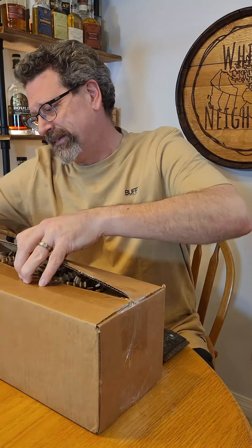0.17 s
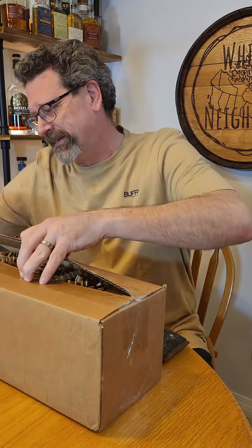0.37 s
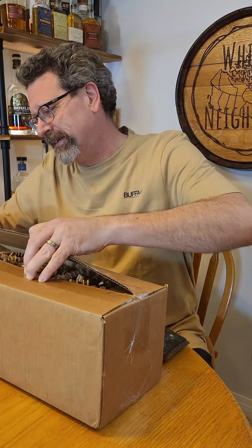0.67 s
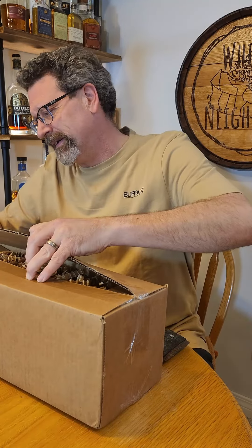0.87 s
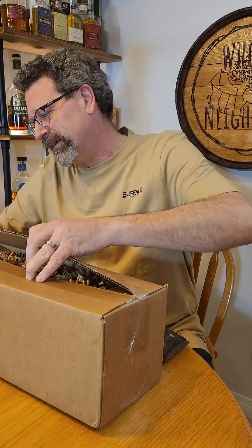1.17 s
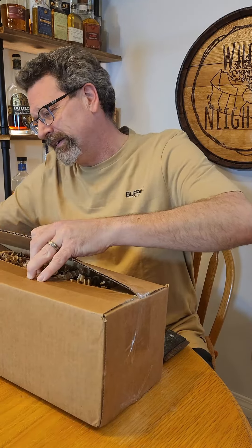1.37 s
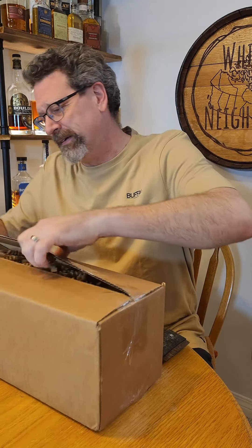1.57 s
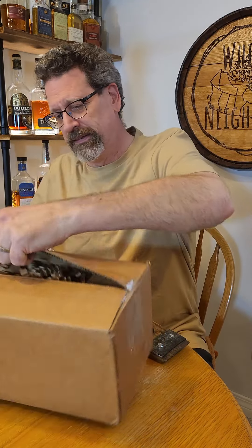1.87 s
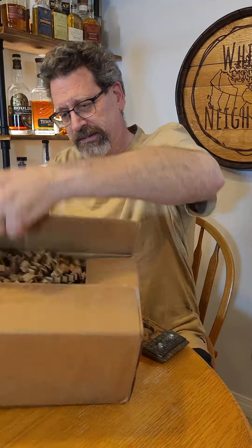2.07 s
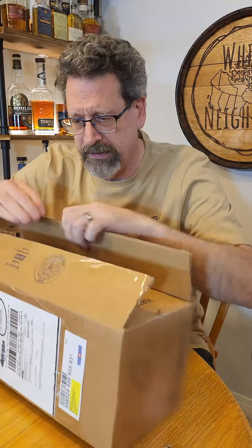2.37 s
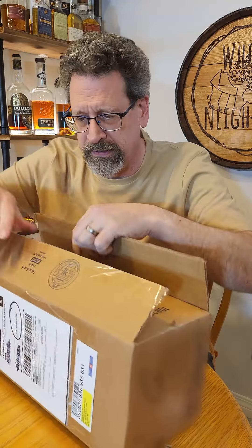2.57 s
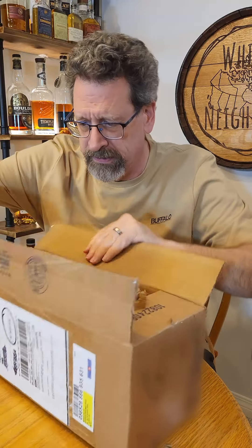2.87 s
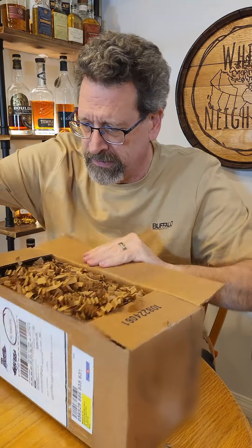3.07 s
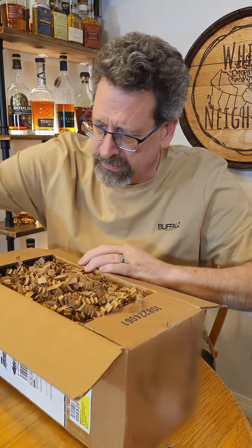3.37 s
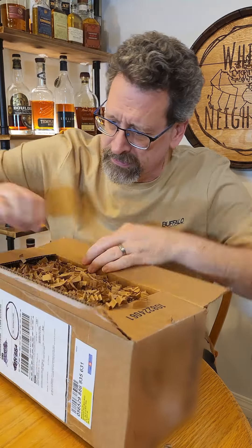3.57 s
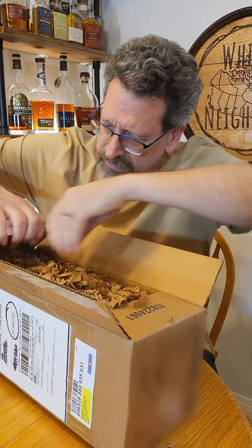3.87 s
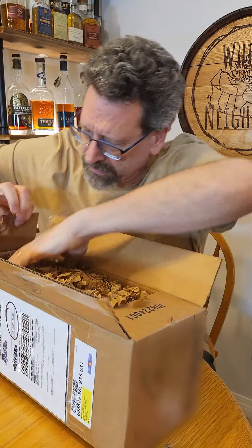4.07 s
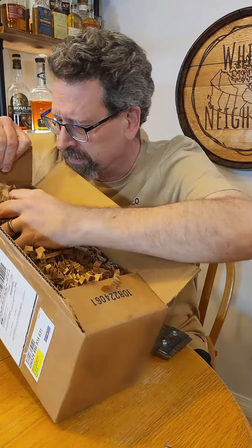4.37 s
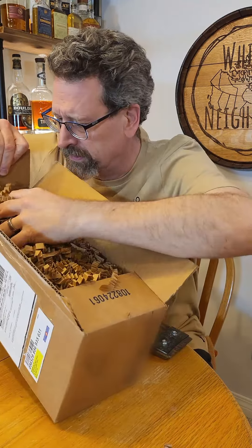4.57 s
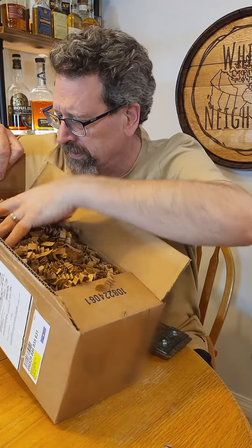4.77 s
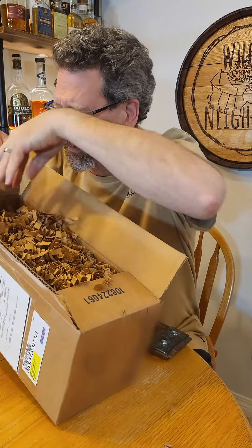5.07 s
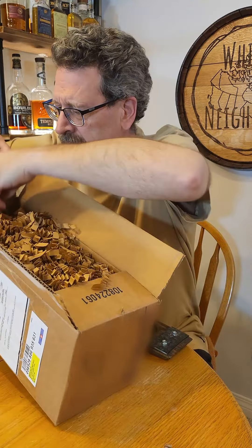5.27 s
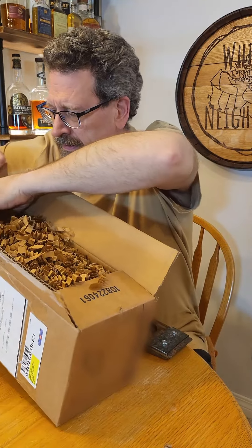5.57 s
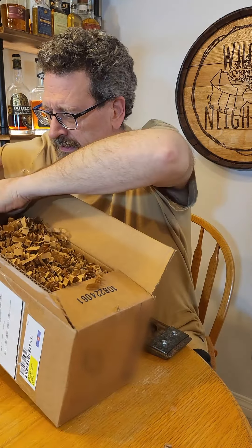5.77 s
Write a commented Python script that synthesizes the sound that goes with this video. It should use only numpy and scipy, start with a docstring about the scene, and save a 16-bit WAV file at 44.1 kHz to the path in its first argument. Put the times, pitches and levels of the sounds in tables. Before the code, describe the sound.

Hands open a cardboard box and dig through crinkly paper filler, with rustling, scraping flaps and hollow knocks on a table.

```python
"""Digging through a cardboard box

A small room, one small microphone close to a wooden table. Hands open a box and dig through crinkled
paper strips, which rustle and snap as their creases buckle. The flaps slip, scraping and creaking;
the box rocks on the table with a rumble, and knocks ring its walls and the air inside."""
import sys
import numpy as np
from scipy import signal
from scipy.fft import rfft, irfft
from scipy.io import wavfile
from scipy.ndimage import uniform_filter1d

SR = 44100
rng = np.random.default_rng(int(sys.argv[2]) if len(sys.argv) > 2 else 0)


def master_out(mix):
    """Clip the mix to full scale and print it as 16-bit PCM to the path in sys.argv[1]."""
    frames = np.transpose(np.atleast_2d(mix))
    ceiling = np.clip(frames, -1, 1)
    pcm = np.round(ceiling * 32767).astype(np.int16)
    wavfile.write(sys.argv[1], SR, pcm)


N = 261188


def gain_of(db):
    """Decibels to amplitude."""
    return 10 ** (np.asarray(db) / 20)


def unit_rms(x):
    """Scales to rms 1."""
    return x / np.sqrt(np.mean(x ** 2) + 1e-20)


def unit_peak(x):
    """Scales to peak 1."""
    return x / abs(x).max()


def steadied(x, window_s):
    """Evens out the chance swells of a noise."""
    power = uniform_filter1d(x ** 2, int(window_s * SR))
    return x / np.sqrt(abs(power) + 1e-20)


def curve_at(points, hz):
    """Reads (freq_hz, value) points on a log frequency axis."""
    freq_hz, value = np.transpose(points)
    return np.interp(np.log(hz + 1), np.log(freq_hz + 1), value)


def add(mix, start_s, sound):
    """Mixes a sound in at start_s."""
    part = mix[round(start_s * SR):][:len(sound)]
    part += sound[:len(part)]


def colour(x, spectrum):
    """Minimum-phase filter through (freq_hz, level_db) points."""
    hz = abs(np.fft.fftfreq(8192, 1 / SR))
    log_gain = np.log(gain_of(curve_at(spectrum, hz)))
    phase = -signal.hilbert(log_gain).imag
    taps = np.fft.ifft(np.exp(log_gain + 1j * phase)).real[:4096]
    return signal.oaconvolve(x, taps)[:len(x)]


def resonance(x, hz, width_hz):
    """Two-pole resonance of gain 1."""
    return signal.lfilter(*signal.iirpeak(hz, hz / width_hz, SR), x)


def clumps(per_s, depth_db):
    """Random swell that bunches the grains."""
    drift = uniform_filter1d(rng.standard_normal(N), int(SR / per_s))
    return gain_of(depth_db * unit_rms(drift))


def clicks(per_s, spread_db):
    """Sparse impulses of random sign, a few of them large."""
    fires = rng.random(N) < per_s / SR
    sign = np.sign(rng.standard_normal(N))
    size = np.minimum(rng.exponential(1, N), 4)
    return fires * sign * gain_of(spread_db * size)


def gesture_powers(gestures, db):
    """Power of each hand gesture, every millisecond: up 20 dB over its rise, down 20 dB over its fall."""
    peak_s, rise_ms, fall_ms = np.array(gestures).T[:3, :, None]
    late_ms = np.arange(N * 1000 // SR + 2) - 1000 * peak_s
    drop_db = 20 * np.maximum(-late_ms / rise_ms, late_ms / fall_ms)
    return gain_of(db[:, None] - drop_db) ** 2


def ms_to_samples(curve):
    """Stretches one value a millisecond to one a sample."""
    return np.interp(np.arange(N) / SR * 1000, np.arange(len(curve)), curve)


def gesture_gain(gestures, db, lag_ms=0.1):
    """Gain of all gestures together, following them with a lag."""
    pole = np.exp(-1 / lag_ms)
    power = signal.lfilter([1 - pole], [1, -pole], gesture_powers(gestures, db).sum(0))
    return ms_to_samples(np.sqrt(power))


def gesture_pitch(gestures, db, hz):
    """The loudest gestures of the moment set the favoured pitch."""
    power = gesture_powers(gestures, db) + 1e-30
    return ms_to_samples(np.exp(np.log(hz) @ power / power.sum(0)))


# Tone colour of the paper through the close microphone, with the microphone's resonance near 6 kHz:
# freq_hz, relative_db
PAPER_AT_MIC = [(350, -27), (600, -6.5), (1100, -3.5), (2200, -0.5), (3100, -3.5), (3900, -6.5), (5000, -5),
                (5900, -3), (6600, -6.5), (7400, -10), (8200, -6.5), (9200, -9), (10700, -7.5),
                (14900, -16), (16000, -21)]
# Hands stirring the paper in the box: peak_s, rise_ms, fall_ms, strips_db, sheets_offset_db
PAPER_STIRS = [(0, 722.0, 150, -46.5, 0.5), (0.091, 140, 170, -42.5, 3.5), (0.173, 10, 97, -36.5, -0.5),
               (0.493, 243.0, 70.0, -62.5, 1), (0.566, 39, 95, -58.5, 5), (0.673, 80.0, 24.0, -60, 2.5),
               (0.71, 9.4, 70, -48.5, 0), (0.855, 223.0, 114, -62, 3), (1.148, 7.1, 37, -60, 4),
               (1.245, 55.0, 63.0, -67, 7), (1.311, 20, 67, -42.5, 2), (1.337, 9.2, 51, -28, 0),
               (1.363, 16.0, 110, -41.5, 4.0), (1.478, 350.0, 234.0, -56, -0.5), (1.534, 76, 150, -47.5, 1),
               (1.66, 30, 89, -47.5, 6.5), (1.77, 120, 210, -55.5, 2), (1.85, 130, 230, -58, 0.5),
               (1.97, 11, 104, -30.5, 1.0), (2.038, 9.5, 200, -40.5, 1), (2.194, 45, 110, -33.5, 1.0),
               (2.306, 23.0, 147.0, -47.0, 0.0), (2.411, 12, 62, -38.5, -0.5),
               (2.479, 42, 180.0, -41.0, -1.0), (2.64, 80, 91, -52, 2), (2.735, 86, 81, -43.0, -1.5),
               (2.88, 180, 310, -44, -1.5), (3.062, 57, 116, -51.5, -0.0), (3.259, 330, 260, -49, 1),
               (3.38, 26, 39.0, -49, 1.5), (3.463, 37, 36, -40.5, -1.5), (3.537, 58.0, 62, -52.0, 3),
               (3.58, 8.3, 270, -57.5, -1.5), (3.747, 49.0, 250, -43, -4), (3.924, 8.1, 31, -48, -1.0),
               (4.038, 5.8, 40, -45, 3.0), (4.093, 44, 71, -40.0, -0.5), (4.156, 120, 220, -37.0, -4.5),
               (4.215, 126.0, 99, -42.5, -1), (4.363, 91, 143, -40, 0), (4.535, 230, 290, -48, -2.5),
               (4.69, 102, 410, -47.5, -4), (4.894, 170, 115, -41.0, -0.5), (5.112, 66, 135, -53, -1.5),
               (5.178, 51.0, 116, -58.5, 1.0), (5.433, 78, 220, -48, -1.0), (5.577, 30, 88.0, -42, -4.5),
               (5.66, 21, 97, -42.0, -4.0), (5.744, 180, 170, -44.5, -2.5), (5.8, 30, 53, -49, -5),
               (5.897, 77, 300, -46, 0.5)]


def paper_rustle():
    """Creases buckle: each click rings a patch of strip for a few cycles, over a hiss of sliding strips."""
    buckles = clicks(per_s=6000, spread_db=4.5)
    patch = rng.integers(0, 24, N)
    bunches = [clumps(per_s=54, depth_db=3) for _ in range(6)]  # strips of like size crackle together
    crackle, t = np.zeros(N), np.arange(200) / SR
    for k, hz in enumerate(np.geomspace(700, 15000, num=24)):
        grain = np.exp(-t * hz / 2.75) * np.sin(2 * np.pi * hz * t)
        grain *= np.sqrt(hz) / np.linalg.norm(grain)
        crackle += signal.oaconvolve(buckles * (patch == k) * bunches[k // 4], grain)[:N]
    rustle = unit_rms(crackle) + 1.28 * rng.standard_normal(N)
    rustle = colour(rustle * clumps(per_s=68, depth_db=1.5), PAPER_AT_MIC)
    spectrum = rfft(steadied(rustle, window_s=0.042))
    hz = np.fft.rfftfreq(N, 1 / SR)
    low = 1 / (1 + (hz / 4000) ** 8)  # broad sheets
    high = 1 - 1 / (1 + (hz / 7500) ** 8)  # thin edges
    sheets, strips, edges = (unit_rms(irfft(spectrum * band, N)) for band in (low, 1 - low - high, high))
    strips_db, sheets_offset_db = np.transpose(PAPER_STIRS)[3:]
    strips_gain = gesture_gain(PAPER_STIRS, strips_db)
    sheets_gain = gesture_gain(PAPER_STIRS, strips_db + sheets_offset_db + 0.5)
    return strips_gain * (strips + gain_of(-6.5) * edges) + sheets_gain * sheets


# Modes of the table, the box walls and the air inside: pitch_hz, width_hz, relative_db
BOX_MODES = [(49.4, 34, -9), (68.8, 30, 3.5), (88, 31, 2.5), (108, 45, 1), (140, 31.4, 2), (204, 30, -0.5),
             (239, 30, 4.5), (330, 77, 5.5), (415, 54, 6.5), (540, 67, 8.5), (690, 143, 4.5), (748, 62, 8),
             (876, 140, -1), (1100, 210, 1), (1270, 197, 4), (1430, 175, 5), (1594, 216, 1),
             (1930, 330, -6.5), (2430, 89, -12)]


def box_ring(drive, centre_hz, octaves, blow=False):
    """The box rings in the modes near the pitch a touch favours; a blow starts them all one way."""
    out = np.zeros(len(drive))
    for k, (hz, width_hz, db) in enumerate(BOX_MODES):
        sign = 1 if blow else (-1) ** k
        nearness = np.exp(-0.5 * (np.log2(hz / centre_hz) / octaves) ** 2)
        out += sign * gain_of(db) * nearness * resonance(drive, hz, width_hz)
    return out


# Hands moving the box on the table, levels relative:
# peak_s, rise_ms, fall_ms, scrape_db, scrape_hz, rock_db, rock_hz, sway_db
BOX_SHOVES = [(0.022, 582.0, 342.0, -34.5, 765, -36.5, 156.0, -49),
              (0.098, 130, 43, -28, 900, -44.0, 171.0, -51),
              (0.171, 2.9, 90, -18.5, 740, -15.5, 179, -30.0),
              (0.279, 7.0, 88, -46, 650.0, -41.5, 188.4, -41),
              (0.412, 4.0, 49, -45.5, 770.0, -40, 166, -53), (0.485, 7.0, 27.0, -45, 755, -40, 191, -47.0),
              (0.569, 27, 49.0, -44.5, 650.0, -46, 186, -51.0),
              (0.654, 7.5, 18.0, -43, 720.0, -32.5, 167.0, -46),
              (0.71, 6.2, 39, -28.5, 784, -31.5, 150, -53),
              (0.773, 562.0, 11.0, -56, 800.0, -52.0, 166.0, -54),
              (0.865, 250, 99, -48, 600.0, -51.5, 161, -81),
              (1.146, 2.53, 66, -32.5, 870, -39.5, 134.0, -58),
              (1.265, 21, 55, -32.5, 606, -33, 142.0, -41), (1.319, 25, 156, -29, 925, -25.5, 150.0, -47),
              (1.363, 100, 73, -23.5, 850, -60.0, 182.0, -72.0),
              (1.52, 290, 29, -38, 960, -36.5, 158.0, -44),
              (1.541, 45.0, 175, -34.5, 885, -44, 172.0, -59.0),
              (1.668, 46.0, 48, -47, 760.0, -36.5, 142, -46), (1.755, 44, 337.0, -44, 960, -48, 162, -46.5),
              (1.964, 4.1, 110, -15.5, 610.0, -17.5, 172, -25),
              (2.045, 28.0, 82, -31, 880.0, -29, 150, -30), (2.117, 8.0, 130, -33, 865, -27.5, 140.0, -40),
              (2.182, 12, 110, -22.5, 780, -20.5, 151, -33),
              (2.294, 71, 44, -31.5, 584, -38.0, 156.0, -76.0),
              (2.4, 99, 200, -36.5, 830.0, -38.5, 146, -48.0), (2.482, 14, 70, -28.5, 760.0, -26, 116, -43),
              (2.607, 26, 230.0, -42, 754, -47, 143.0, -77),
              (2.697, 4.0, 38, -40, 830.0, -22.5, 123, -26.5),
              (2.74, 24, 60.0, -37.5, 890.0, -47, 152, -63.0),
              (2.829, 47, 880, -41.5, 730, -42.5, 128, -47),
              (2.902, 10.0, 52.0, -48.0, 860.0, -47, 108.0, -33),
              (3.055, 2.9, 21, -24.5, 614, -14.5, 126, -17),
              (3.186, 71.0, 290, -38, 650.0, -41.5, 138, -42.0),
              (3.379, 54.0, 71.0, -47, 980.0, -45.0, 141.0, -47),
              (3.429, 4.6, 150, -38.5, 850, -41.5, 142.0, -41.5),
              (3.455, 4.0, 370, -52, 1290, -67.0, 148, -63), (3.748, 53, 204, -39.5, 970, -46, 181, -49),
              (3.92, 6.5, 610, -54.5, 1010, -54.5, 148, -59), (4.035, 4.0, 55, -37, 680.0, -27, 167, -31.5),
              (4.152, 93, 170, -36, 980, -43.5, 155, -51),
              (4.251, 39, 160, -72.0, 970.0, -42.5, 141, -42.5),
              (4.357, 50.0, 120, -36.5, 920, -43.5, 131.0, -51),
              (4.415, 130, 44, -41, 1060.0, -78.0, 189.0, -81.0),
              (4.535, 76, 220, -42.5, 835, -50, 196, -53),
              (4.658, 17.0, 330, -52.0, 730.0, -63, 164.5, -68),
              (4.904, 160, 47, -34.5, 1070.0, -36.5, 111, -39.5),
              (5.028, 5.9, 17.3, -47, 1255, -62, 123, -92),
              (5.112, 92.0, 160, -66, 1200.0, -95.0, 128.0, -81.5),
              (5.492, 330, 160, -48.0, 730, -56, 174.0, -57.5),
              (5.57, 39.0, 180, -47.5, 680.0, -44.5, 169, -58),
              (5.741, 260, 85.0, -41.5, 860, -50, 168.0, -59),
              (5.9, 100, 142.0, -42.5, 760.0, -55, 149.0, -65.0)]


def flap_scrape():
    """Flaps slip unevenly against each other and drive the wall modes."""
    db, hz = np.transpose(BOX_SHOVES)[3:5]
    slips = unit_rms(clicks(per_s=1500, spread_db=4)) + 0.98 * rng.standard_normal(N)
    slips *= clumps(per_s=77, depth_db=6)
    walls = box_ring(slips, gesture_pitch(BOX_SHOVES, db, hz), octaves=0.9)
    return steadied(walls, window_s=0.019) * gesture_gain(BOX_SHOVES, db - 2.5)


def box_rumble():
    """The loaded box rocks on the table, and the table top sways, following the weight on it."""
    rock_db, rock_hz, sway_db = np.transpose(BOX_SHOVES)[5:]
    rock = box_ring(rng.standard_normal(N), gesture_pitch(BOX_SHOVES, rock_db, rock_hz), octaves=0.61)
    sway = box_ring(rng.standard_normal(N), centre_hz=55.2, octaves=0.47)
    rock = steadied(rock, window_s=0.05) * gesture_gain(BOX_SHOVES, rock_db - 2.5, lag_ms=4)
    sway = steadied(sway, window_s=0.081) * gesture_gain(BOX_SHOVES, sway_db + 0.5, lag_ms=11)
    return rock + sway


# Single snaps of paper and tape, near the microphone: start_s, peak_db, centre_hz
PAPER_SNAPS = [(.069, -31, 3010), (0.1693, -23, 2820), (0.279, -33, 3190), (0.485, -36, 2640),
               (.7071, -23.5, 2430), (.8634, -37, 3190), (1.1448, -35.5, 4330), (1.3234, -14.5, 4960),
               (1.336, -7, 5200), (1.4734, -23, 5340), (1.537, -28, 3550), (1.6223, -28.5, 2500),
               (1.6553, -28, 2650), (1.8366, -29, 5460), (1.9609, -14, 2950), (2.0436, -14.5, 4500),
               (2.1829, -33, 2660), (2.1979, -20, 6130), (2.308, -36, 5680), (2.407, -29, 5540),
               (2.4773, -34, 3110), (2.571, -33, 6370), (2.697, -27, 6060), (2.871, -34, 5700),
               (3.058, -41, 4480), (3.107, -27.5, 5650), (3.157, -33.5, 2490), (3.259, -28.5, 4070),
               (3.3773, -31.5, 3040), (3.4326, -32, 5340), (3.454, -28, 6350), (3.5362, -34, 4300),
               (3.584, -30, 5500), (3.7334, -34, 5950), (3.9245, -36, 3450), (4.0374, -26.5, 3100),
               (4.0811, -40, 4780), (4.1367, -22, 6200), (4.2901, -34, 6140), (4.3308, -20, 5760),
               (4.496, -27, 5990), (4.561, -29, 4650), (4.683, -36.5, 5980), (4.869, -24.5, 5760),
               (5.11, -28, 5300), (5.401, -34, 4690), (5.4352, -30, 7540), (5.557, -33, 5900),
               (5.5776, -27, 5450), (5.648, -32, 5860), (5.666, -22.5, 5930), (5.8884, -34, 2510)]


def paper_snaps(tick_t60_s=0.0038, spray_t60_s=0.035, spray_db=-15):
    """Paper or tape snaps: a tick and a brief spray of noise through a wide resonance."""
    out, t = np.zeros(N), np.arange(SR // 10) / SR
    envelope = gain_of(-60 * t / tick_t60_s) + gain_of(spray_db - 60 * t / spray_t60_s)
    for start_s, peak_db, hz in PAPER_SNAPS:
        burst = rng.standard_normal(len(t)) * envelope
        snap = colour(resonance(burst, hz, width_hz=0.36 * hz) + 0.37 * burst, PAPER_AT_MIC)
        add(out, start_s, gain_of(peak_db) * unit_peak(snap))
    return out


# Blows on the box, close up: start_s, ring_peak_db, pitch_hz, decay_s, crack_offset_db
BOX_KNOCKS = [(.168, -9.5, 194, 0.16, -13), (.283, -26, 196, 0.58, -21), (.411, -31, 717, 0.12, -7.5),
              (.445, -33.5, 187, 0.063, -6), (.482, -26.5, 192, .19, -26), (0.565, -28.5, 193, 0.15, -11.5),
              (.65, -30, 187, 0.17, -8.5), (.708, -29, 145, 0.25, 3), (.863, -36.5, 537, 0.16, -29),
              (1.145, -25, 891, 0.15, -6), (1.256, -32.5, 140, 0.2, -7), (1.333, -22, 133, 0.44, 2.5),
              (1.506, -27, 140, .3, -25), (1.655, -28, 123, 0.4, -5), (1.96, -11.5, 236, 0.38, 0.5),
              (2.04, -18, 196, 0.14, 2.5), (2.115, -22, 130, 0.16, -18), (2.181, -18.5, 112, 0.25, -0.5),
              (2.306, -34.5, 128, 0.18, -0.5), (2.383, -26.5, 417, .2, -3.5),
              (2.479, -15.5, 71.6, 0.22, -13.5), (2.695, -15, 151, 0.13, -17), (2.823, -31, 122, .18, -10),
              (2.873, -31, 800, 0.063, 1), (2.896, -25, 59.6, .14, -17), (3.054, -10.5, 116, 0.095, -17.5),
              (3.157, -32, 61.9, 0.08, -2.5), (3.201, -30.5, 137, 0.096, -4.5),
              (3.225, -32, 308, 0.17, -12), (3.428, -40.5, 72, .11, 1.5), (3.736, -38, 547, 0.16, 4),
              (4.035, -18.5, 490, 0.15, -6), (4.912, -31, 75, .2, -12), (4.042, -29, 140, .2, -15),
              (4.556, -32, 805, 0.15, -6), (5.569, -30, 595, 0.099, -2.5), (5.887, -40.5, 415, 0.31, 5.5)]


def box_knocks(push_rise_cycles=0.56, puff_db=-21):
    """A springy push with a short rattle rings the box; the walls crack and the paper gives a puff."""
    out, t = np.zeros(N), np.arange(SR // 3) / SR
    for start_s, db, hz, decay_s, crack_db in BOX_KNOCKS:
        rattle, grit, hiss = rng.standard_normal((3, len(t)))
        fall = gain_of(-60 * t / decay_s)
        rise = t * hz / push_rise_cycles
        push = rise * np.exp(1 - rise) * np.sin(2 * np.pi * hz * t)  # the wall gives and springs back
        octaves = 1 - 0.05 * db  # softer blows spread over more modes
        ring = box_ring(push + 0.33 * rattle * fall, hz, octaves, blow=True) * np.sqrt(fall)
        crack = box_ring(grit * fall ** 2.4, centre_hz=850, octaves=1)
        puff = colour(hiss * fall, PAPER_AT_MIC)
        knock = unit_peak(ring) + gain_of(crack_db) * unit_peak(crack) + gain_of(puff_db) * unit_peak(puff)
        add(out, start_s, gain_of(db) * knock)
    return out


# Short creaks of a flap, close up: start_s, peak_db, pitch_hz, length_s
FLAP_CREAKS = [(1.146, -23, 866, 0.011), (1.373, -19, 1270, 0.0078), (2.286, -32, 413, 0.024),
               (2.604, -41.5, 540, 0.034), (2.869, -36, 790, 0.016), (3.209, -41, 540, 0.018),
               (3.378, -39, 1490, 0.012), (3.455, -42, 1550, 0.012), (3.465, -28, 1430, 0.014),
               (3.724, -42.5, 1320, 0.038), (3.766, -31, 1386, 0.012), (4.422, -38, 1100, 0.013),
               (4.518, -35.5, 1430, 0.02), (5.027, -41, 1426, 0.013), (5.571, -29, 565, 0.0069),
               (5.737, -31, 923, 0.01)]


def flap_creaks():
    """A flap slips at a steady rate for a moment: a brief, slightly rough tone."""
    out, t = np.zeros(N), np.arange(SR // 10) / SR
    for start_s, peak_db, hz, length_s in FLAP_CREAKS:
        wobble = uniform_filter1d(rng.standard_normal(len(t)), 60)
        tone = np.sin(2 * np.pi * hz * np.cumsum(1 + 0.46 * wobble) / SR)
        rise = 4 * t / length_s
        add(out, start_s, gain_of(peak_db) * rise * np.exp(1 - rise) * tone)
    return out


# Decay of the small room around the table: freq_hz, t60_s
ROOM_DECAY = [(100, 0.31), (500, 0.3), (2000, 0.28), (6000, 0.033), (15000, 0.29)]


def room_echo(x):
    """Sparse reflections of random sign, each band dying at its own speed."""
    taps = np.zeros(SR // 2)
    slots = np.arange(150, len(taps) - 20, 20)
    taps[slots + rng.integers(0, 20, len(slots))] = rng.choice([-1., 1.], len(slots))
    hz, t, bands = signal.stft(taps, SR, nperseg=256)
    decay = gain_of(-60 * t / curve_at(ROOM_DECAY, hz)[:, None])
    tail = signal.istft(bands * decay, SR, nperseg=256)[1]
    return signal.fftconvolve(x, tail / np.linalg.norm(tail))[:N]


# The quiet room at the microphone: freq_hz, relative_db
ROOM_TONE_SPECTRUM = [(15, -41), (25, -4), (68, 4), (108, -10), (206, -28), (354, -23), (394, -27),
                      (560, -14), (624, -53.5), (1190, -17.5), (1440, -6), (1740, -19.5), (2690, -25.5),
                      (14000, -30), (16000, -18)]


def room_tone(level_db=-62.5):
    """A faint, steady rumble and hiss."""
    return gain_of(level_db) * unit_rms(colour(rng.standard_normal(N), ROOM_TONE_SPECTRUM))


def scene():
    """Box and paper close to the microphone, their echo and the quiet room, in mono."""
    near = paper_rustle() + flap_scrape() + box_rumble() + box_knocks() + flap_creaks() + paper_snaps()
    return (near + gain_of(-12.5) * room_echo(near) + room_tone())[None]


def record(dry):
    """A small microphone loses the deepest bass; the highest treble is cut off."""
    low_cut_hz, high_cut_hz = 45, 15900
    thinned = signal.lfilter(*signal.butter(2, low_cut_hz, "high", fs=SR), dry)
    band_limit = signal.firwin(511, high_cut_hz, window=("kaiser", 9), fs=SR)
    return signal.oaconvolve(thinned, band_limit[None], "same")


dry = scene()
out = record(dry)
master_out(out)
```